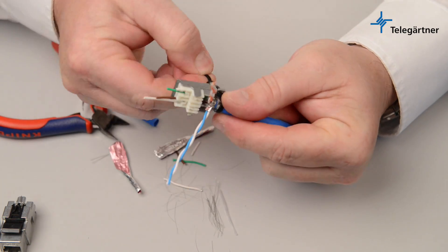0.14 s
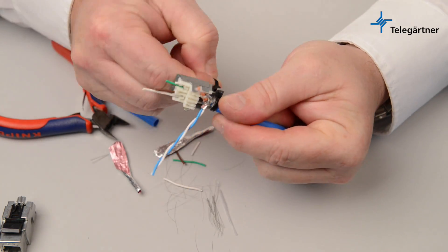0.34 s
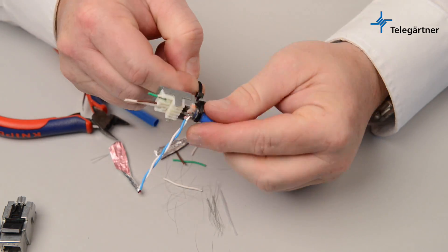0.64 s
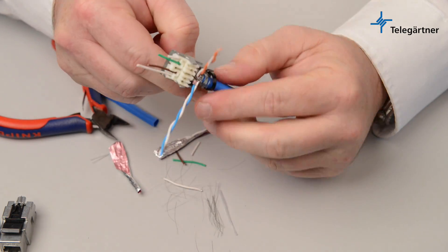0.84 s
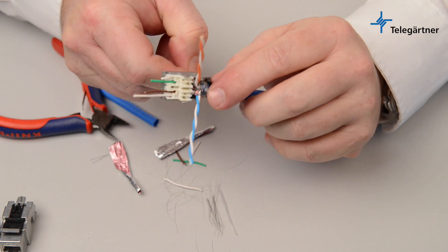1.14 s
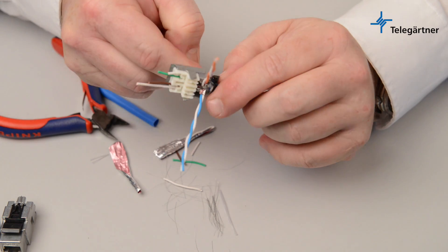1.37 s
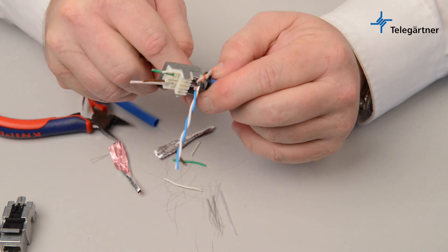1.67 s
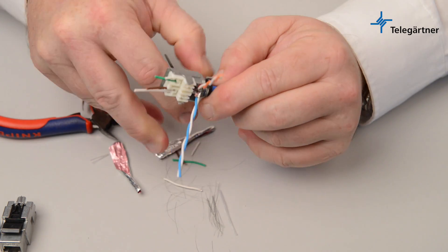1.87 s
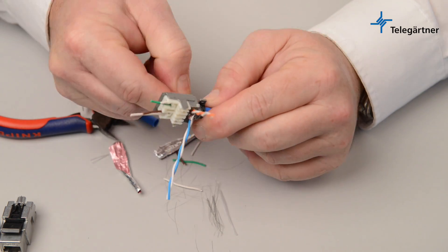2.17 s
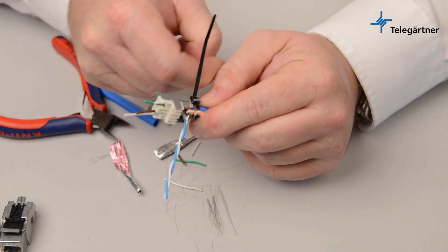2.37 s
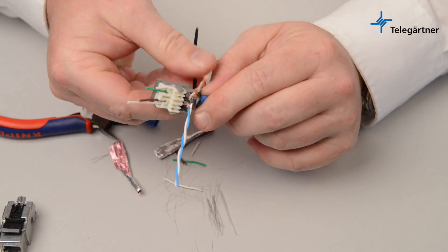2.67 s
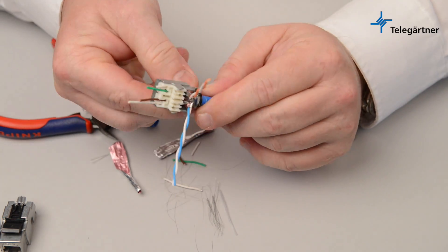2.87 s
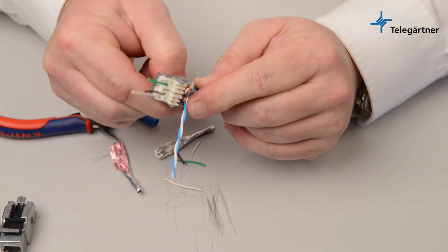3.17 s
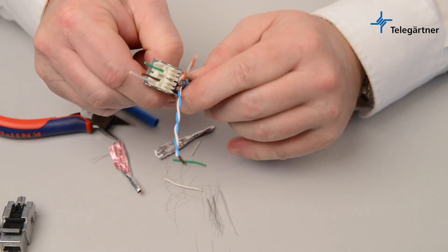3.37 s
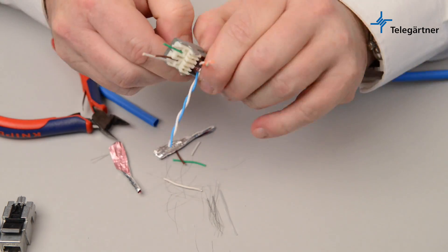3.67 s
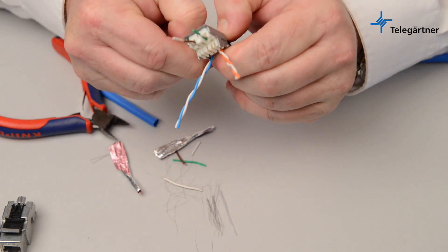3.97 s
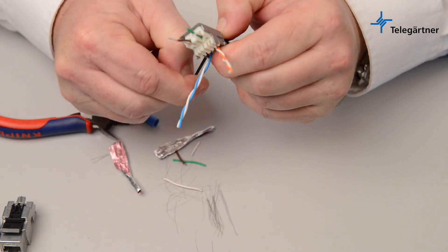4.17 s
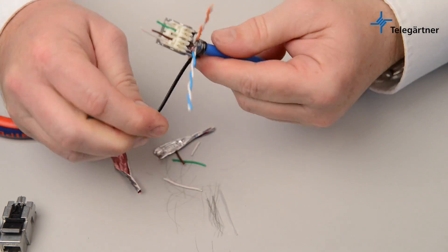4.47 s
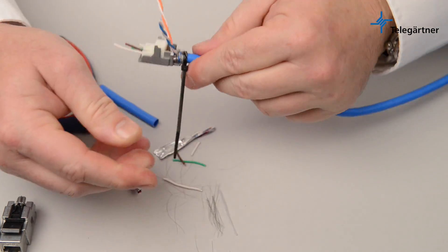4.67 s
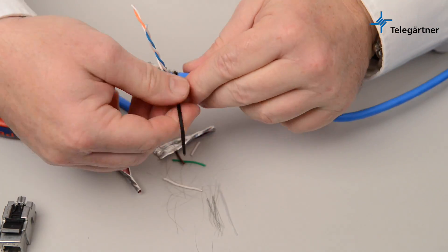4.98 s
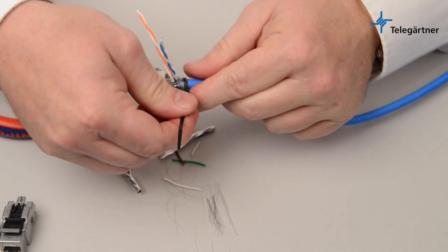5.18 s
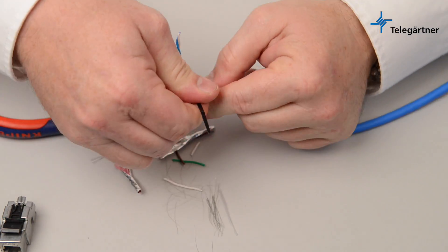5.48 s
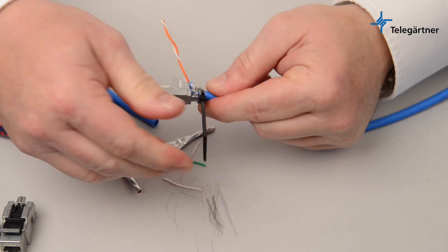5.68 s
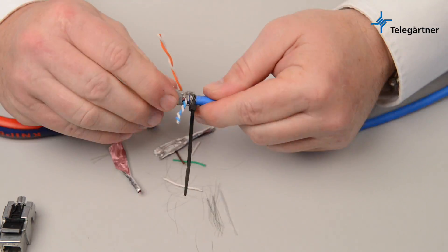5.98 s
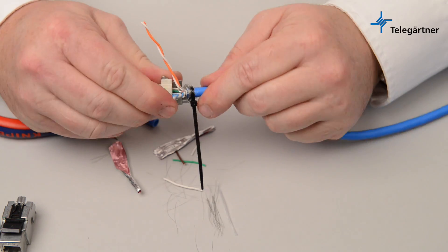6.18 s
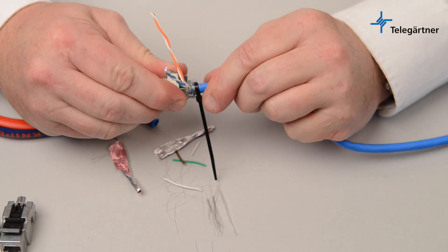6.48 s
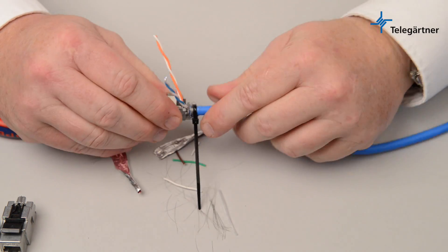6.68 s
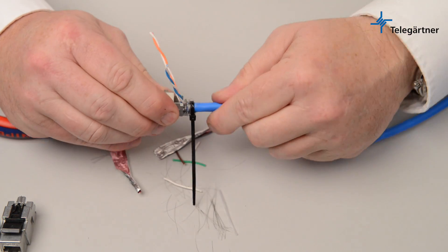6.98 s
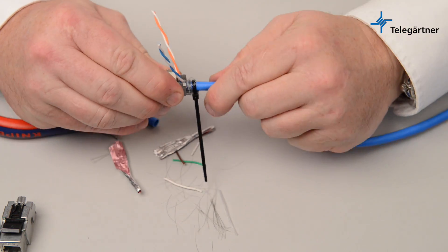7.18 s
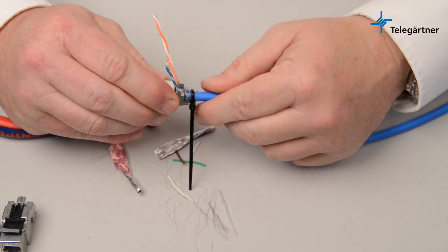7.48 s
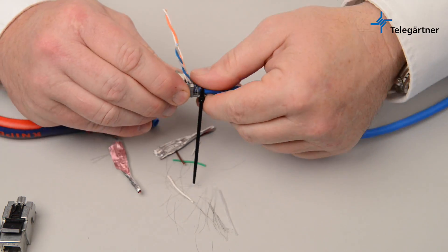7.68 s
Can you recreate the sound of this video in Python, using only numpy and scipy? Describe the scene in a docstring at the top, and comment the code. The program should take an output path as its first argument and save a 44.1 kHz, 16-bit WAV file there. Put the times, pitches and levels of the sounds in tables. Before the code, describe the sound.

A close microphone in a small hard room catches quiet ventilation, fuzzy fan hum and a barely audible steady electrical whine. From 0.15 to 0.55 seconds, a plastic cable tie clicks unevenly through its head, with two sharper snaps around 0.33. A few tiny metal ticks follow. At 1.37 the clicks resume and tighten into a loud, rapid zip until 1.56. A faint bump leads to a bright double snap at 2.23 with weaker clicks after, and another hard snap comes at 3.27. Skin rubs softly around 3.4; light clicks and hollow bench knocks arrive near 3.8. A slight strap slip precedes strong woody knocks at 4.57 to 4.8, then faint rubbing and sparse ticks. A soft knock at 6.3 leads to a heavy, duller bump cluster around 6.7 to 6.9. Smaller bumps come near 7.65. Brief flutter echoes follow the impacts.

```python
"""Cable tie pulled through its head

Fingers pull a plastic cable tie: the pawl lands and rebounds on the teeth in short runs, a burst each.
Small metal contacts tick as narrow modes; grainy hiss leads into some loud blows; the strap slips as
the same hiss and rubs on skin through its resonances; a cable end knocks on the hollow bench, driving
damped modes and a dense board. A fan hums as fuzzy tones in ventilation noise, over a faint steady
electrical whine. The small hard room answers with flutter echoes and a short tail."""
import sys
import numpy as np
from scipy import signal
from scipy.io import wavfile
from scipy.ndimage import uniform_filter1d

SR = 44100
rng = np.random.default_rng(int(sys.argv[2]) if len(sys.argv) > 2 else 0)


def natural_amplitude(level_db):
    """Convert a level in decibels to a linear amplitude factor, elementwise."""
    exponent = np.asarray(level_db, float) / 20
    return 10 ** exponent


def master_out(mix):
    """Clip the mix to full scale and print it as 16-bit PCM to the path in sys.argv[1]."""
    frames = np.transpose(np.atleast_2d(mix))
    ceiling = np.clip(frames, -1, 1)
    pcm = np.round(ceiling * 32767).astype(np.int16)
    wavfile.write(sys.argv[1], SR, pcm)


N = 345303  # samples

# Broad colour of plastic snaps, hisses and clicks: (frequency [Hz], relative level [dB])
PLASTIC_COLOUR = [(700, -65.5), (1700, -40.5), (2300, -27), (2900, -6.5), (4200, -2.5), (5800, 3),
                  (7800, 4), (10000, 7), (13000, 0), (15500, -2.5), (17000, -54.5)]
SLIDE_FADE_DB = -6.5  # reached at the end of a slip or stroke


def evened(x):
    """Scales to unit rms."""
    return x / np.sqrt(np.mean(x ** 2) + 1e-20)


def peaked(x, db):
    """Scales to a peak level."""
    return natural_amplitude(db) * x / abs(x).max()


def read(points, hz):
    """Interpolates a table over log frequency."""
    f, value = np.transpose(points)
    return np.interp(np.log(hz + 1), np.log(f + 1), value)


def add(mix, s, sound):
    """Adds a sound at s seconds, cut at the end of the mix."""
    part = mix[round(s * SR):][:len(sound)]
    part += sound[:len(part)]


def ring(hz, t60_s, size):
    """A damped sine."""
    t = np.arange(size) / SR
    return natural_amplitude(-60 * t / t60_s) * np.sin(2 * np.pi * hz * t)


def resonate(x, hz, width_hz):
    """Resonance on a fixed or moving frequency: shifts it to zero, smooths twice, shifts back."""
    turn = np.exp(2j * np.pi * np.cumsum(hz * np.ones(len(x))) / SR)
    r = np.exp(-np.pi * width_hz / SR)
    smooth = signal.lfilter([(1 - r) ** 2], [1, -2 * r, r * r], x / turn)
    return 2 * (turn * smooth).real


def causal(points, size=1024):
    """Minimum-phase impulse response with the given spectrum."""
    log_gain = np.log(natural_amplitude(read(points, abs(np.fft.fftfreq(size, 1 / SR)))))
    return np.fft.ifft(np.exp(np.conj(signal.hilbert(log_gain)))).real[:size // 2]


def wander(count, size):
    """Slow random curve of unit rms: noise averaged twice over size steps."""
    return evened(uniform_filter1d(uniform_filter1d(rng.standard_normal(count), size), size))


def air():
    """Ventilation noise in drifting spectral patches, with fan tones of narrow-band noise."""
    # Noise spectrum: (frequency [Hz], relative density [dB])
    air_colour = [(15, -72.5), (25, -46.5), (131, -15.5), (214, -15), (457, 3.5), (510, -9.5), (600, -1),
                  (831, -7.5), (1060, -5.5), (1640, -16.5), (1830, -15.5), (4600, -34), (5270, -33),
                  (15600, -41.5), (16800, -64.5)]
    # Ventilation swells and sinks: (time [s], level [dB])
    air_level = [(0.0, -59.5), (4.45, -60), (4.64, -56.5), (5.84, -64.5), (7.0, -57), (7.5, -62),
                 (7.83, -56.5)]
    # Share of swell and gusts per frequency, treble steady: (frequency [Hz], share)
    restless = [(1200, 1), (3500, .3)]
    # Fan tones: (frequency [Hz], width [Hz], mean level [dB])
    fan = [(341, 68, -73.5), (460, 66, -71.5), (650, 91, -78.5), (1041.3, 83, -65)]
    gust_db, patch_db = 1.5, 2.9  # rms
    hop = 256
    frames, hz = N // hop + 5, np.fft.rfftfreq(1024, 1 / SR)
    a, b, patches = rng.standard_normal((frames, 513, 3)).T
    patches = evened(uniform_filter1d(uniform_filter1d(patches, 10, 0), 16, 1))
    s, db = np.transpose(air_level)
    mean_db = db.mean()
    swell_db = np.interp(np.arange(frames) * hop / SR, s, db - mean_db)
    motion_db = gust_db * wander(frames, 12) + swell_db
    field_db = read(air_colour, hz)[:, None] + read(restless, hz)[:, None] * motion_db
    field_db = field_db + patch_db * patches
    wash = signal.istft((a + 1j * b) * natural_amplitude(field_db), nperseg=1024, noverlap=768)[1][:N]
    tones = np.zeros(N)
    for tone_hz, width_hz, tone_db in fan:
        unsteady = natural_amplitude(tone_db + 4.0 * wander(N, 2500))
        tones += unsteady * evened(resonate(rng.standard_normal(N), tone_hz, width_hz))
    tone_swell_db = np.interp(np.arange(N) / SR, s, db - mean_db)
    return natural_amplitude(mean_db) * evened(wash) + natural_amplitude(tone_swell_db) * tones


def whine():
    """Steady electrical tones: plain sines."""
    # (frequency [Hz], rms level [dB])
    whine_tones = [(1771, -91.5), (8651, -95.5), (8753, -94.5), (9749, -102)]
    t = np.arange(N) / SR
    return sum(np.sqrt(2) * natural_amplitude(db) * np.sin(2 * np.pi * hz * t) for hz, db in whine_tones)


def grainy_noise(length_s):
    """Time axis and white noise under a quickly varying random gain."""
    t = np.arange(0, length_s, 1 / SR)
    noise = rng.standard_normal(len(t))
    grain_db = 2.8 * evened(uniform_filter1d(rng.standard_normal(len(t)), 150))
    return t, noise * natural_amplitude(grain_db)


def hisses():
    """Grainy hiss in plastic colour: faint leads swell into a loud snap or knock, strap slips weaken."""
    # Hiss leading into a loud snap or knock: (start [s], length [s], level before the swell [dB])
    leads = [(0.133, .017, -60), (1.354, 0.014, -57.5), (2.2, .026, -54), (3.238, 0.029, -53.5),
             (4.638, .055, -61), (6.663, 0.064, -70.5)]
    # Strap sliding through the fingers: (start [s], length [s], starting level [dB], brightness [dB])
    slips = [(4.322, 0.19, -76, -10.5), (6.348, .12, -82, -11)]
    swell_db, swell_s, lead_bright_db = 15.5, 0.003, -4.5
    out, edge = np.zeros(N), causal(PLASTIC_COLOUR)
    split = signal.butter(2, 7000, fs=SR)
    rows = [(*row, lead_bright_db, True) for row in leads] + [(*row, False) for row in slips]
    for s, length_s, db, bright_db, is_lead in rows:
        t, grain = grainy_noise(length_s)
        if is_lead:
            shape_db = swell_db * np.exp((t - length_s) / swell_s)
        else:
            shape_db = SLIDE_FADE_DB * t / length_s
        hiss = evened(np.convolve(grain, edge)[:len(grain)])
        dull = signal.lfilter(*split, hiss)
        tilted = dull / natural_amplitude(bright_db) + hiss - dull
        add(out, s, natural_amplitude(db + shape_db) * signal.windows.tukey(len(t), 0.1) * tilted)
    return out


def room(near, x):
    """Flutter echoes of near; x feeds two sparse random tails that die by band, faster late."""
    # Flutter between bench and ceiling: (delay [ms], level [dB])
    flutter = [(4.2, -9), (8.7, -19.5), (12.9, -15.5), (17.2, -21)]
    # Decay before the late drop: (frequency [Hz], T60 [s])
    decay = [(300, 0.27), (1000, 0.52), (3000, 0.35), (8000, 0.35), (16000, 0.34)]
    tail_db, turn_hz = -5.5, 11
    at, out = np.arange(250, SR // 2 - 12, 12), np.zeros(N)
    for ms, db in flutter:
        add(out, ms / 1000, natural_amplitude(db) * near)
    for k in range(2):
        taps = np.zeros(SR // 2)
        taps[at + rng.integers(0, 12, len(at))] = rng.choice([-1., 1.], len(at))
        hz, t, z = signal.stft(taps, SR, nperseg=128)
        fall_db = -60 * t / read(decay, hz)[:, None] - (t / 0.05) ** 4
        tail = signal.istft(z * natural_amplitude(fall_db), SR, nperseg=128)[1]
        turn = np.sin(2 * np.pi * turn_hz * np.arange(N) / SR + k * np.pi / 2)  # tails take turns
        out += natural_amplitude(tail_db) * signal.fftconvolve(x * turn, tail / np.linalg.norm(tail))[:N]
    return out


def snaps():
    """Pawl landing, rebounds and rattle, coloured by pawl and head; returns direct and room send."""
    # (time [s], peak [dB], pawl ring [Hz], head body [dB], room send peak [dB])
    snap_rows = [(0.1523, -23, 8900, -34, -13.5), (0.2223, -25.5, 8900, -33.5, -15),
                 (0.242, -25.5, 7900, -41, -14.5), (0.305, -28.5, 7600, -42, -16),
                 (0.3168, -23, 7460, -40.5, -15), (0.3305, -12.5, 8650, -51, -13.5),
                 (0.3436, -13, 9100, -38, -16), (0.3952, -24, 8000, -35, -16.5),
                 (0.4499, -28.5, 8000, -36, -18.5), (0.504, -28.5, 9500, -42, -16.5),
                 (0.5607, -28.5, 8560, -30, -16.5), (1.3710, -20.5, 10500, -21.5, -11.5),
                 (1.4091, -20.5, 9000, -24, -13.5), (1.4544, -21, 10540, -27, -11),
                 (1.471, -10.5, 9700, -37, -22.5), (1.485, -9, 10500, -38, -18),
                 (1.5009, -12.5, 9500, -34, -18), (1.5150, -9.5, 10000, -33, -10.5),
                 (1.5306, -12, 10170, -27, -10), (1.5392, -14.5, 9800, -20.5, -17),
                 (1.5636, -14, 7800, -24.5, -15), (2.232, -12, 10600, -46.5, -16.5),
                 (2.2475, -9, 11240, -32.5, -10.5), (2.3243, -21.5, 10400, -14.5, -17.5),
                 (2.3799, -26.5, 9880, -33.5, -32.5), (3.267, -13, 10200, -27, -9),
                 (3.3579, -27.5, 8600, -28, -13), (3.7590, -33, 7900, -44, -30),
                 (3.7743, -38, 8700, -34, -17), (3.8076, -18.5, 10000, -29, -22),
                 (3.9384, -28.5, 6450, -36.5, -35), (3.9564, -40, 6500, -27, -51.5)]
    # Pawl landing and rebounds, before random spread: (delay [ms], signed strength)
    rebounds = [(0, 1), (.5, .75), (1.2, -.45), (1.6, .3), (2.1, -.22)]
    firm_hz, bright_db_per_octave = 10200, 12.5  # higher pawl ring, brighter snap
    direct, send = np.zeros(N), np.zeros(N)
    hz, colour_db = np.transpose(PLASTIC_COLOUR)
    thin = signal.butter(6, 2000, "high", fs=SR)  # a part this small radiates no bass
    for s, db, pawl_hz, head_db, send_db in snap_rows:
        rattle_db = -60 * np.arange(600) / SR / 0.015
        drive = 0.12 * rng.standard_normal(600) * natural_amplitude(rattle_db)
        for ms, strength in rebounds:
            delay = round(ms * rng.uniform(0.93, 1.07) * SR / 1000)
            drive[delay] += strength * rng.uniform(0.8, 0.88)
        tilt_db = bright_db_per_octave * np.log2(pawl_hz / firm_hz)
        edge = causal(np.transpose([hz, colour_db + tilt_db * np.log2(hz / 8000)]))
        pawl = 0.19 * ring(pawl_hz, t60_s=0.001, size=512)
        head = natural_amplitude(head_db) * ring(2280, t60_s=0.01, size=512)
        body = peaked(edge, 0) + pawl + head
        add(direct, s, peaked(signal.lfilter(*thin, np.convolve(drive, body)), db))
        add(send, s, peaked(signal.lfilter(*thin, body), send_db))  # rebounds blur in the diffuse field
    return direct, send


def knocks():
    """Rough contacts drive bench modes and board, hard ones the high modes; returns body and edge."""
    # (time [s], body level [dB], edge re body [dB], hardness [dB/octave], contact [s])
    knock_rows = [(0.605, -46, -38, -2, 0.021), (2.147, -45, -23.5, -16, 0.0036),
                  (3.564, -45.5, -32, -7, 0.0061), (3.762, -35.5, -8, 26, 0.01),
                  (3.811, -31, -14, 15, 0.0013), (4.564, -45, 13, 12, 0.0007),
                  (4.57, -30.5, -11, 6.5, 0.019), (4.703, -24.5, 2.5, 21, 0.00031),
                  (4.706, -15, -29, 10, 0.00079), (4.735, -28.5, -31.5, -6, 0.019),
                  (4.79, -34, -29, -1.5, 0.0063), (4.858, -43.5, -40, -8, 0.0024),
                  (6.317, -39, -15, 32, 0.00049), (6.714, -37.5, -35, 3.5, 0.0086),
                  (6.797, -29, -14.5, -1, 0.021), (6.818, -15.5, -27, -1.5, 0.015),
                  (6.84, -19, -49, -4, 0.015), (6.884, -29, -49, -5, 0.008), (7.649, -32.5, -12, 1, 0.0069),
                  (7.668, -30.5, -24, -5.5, 0.014), (7.712, -38.5, -30.5, -3, 0.011)]
    # Bench modes: (frequency [Hz], relative level [dB], T60 [s])
    bench_modes = [(492.4, -11.5, 0.11), (621.4, -2, 0.1), (660.2, 1.5, .15), (824, -7, .08),
                   (875, 4, 0.14), (964, 10, 0.043), (1398, 6, 0.028), (1544, 2.5, 0.078),
                   (1665, -18, 0.075), (2000, -1, 0.031), (2170, -10.5, .03), (2604, -16, 0.025)]
    # Broad colour of the bench top: (frequency [Hz], relative level [dB])
    board_colour = [(150, -65.5), (330, -13.5), (500, 3), (800, 3.5), (1200, -7.5), (1800, -6.5),
                    (2700, -20.5), (4000, -39.5), (8000, -111)]
    hard_top_hz, thud_hz, thud_db = 2300, 162, -39  # each blow also shoves the whole bench
    out, edges, t = np.zeros(N), np.zeros(N), np.arange(9000) / SR
    board_hz, board_db = np.transpose(board_colour)
    high = signal.butter(3, [1900, 6500], "band", fs=SR)
    thin = signal.butter(4, 380, "high", fs=SR)
    thud = ring(thud_hz, t60_s=0.059, size=len(t)) * (1 - np.exp(-t / 0.0029))
    board_octaves = np.log2(np.minimum(board_hz, hard_top_hz) / 700)
    for s, db, edge_db, hard_db, contact_s in knock_rows:
        u = t / contact_s
        drive = rng.standard_normal(len(t)) * np.sqrt(u) * np.exp(-u)
        modes = np.zeros(len(t))
        for hz, mode_db, t60_s in bench_modes:
            lift_db = hard_db * np.log2(min(hz, hard_top_hz) / 700)
            modes += natural_amplitude(mode_db + lift_db) * ring(hz, t60_s, size=len(t))
        board = causal(np.transpose([board_hz, board_db + hard_db * board_octaves]), size=2048)
        dense = evened(signal.fftconvolve(drive, board)[:len(t)])
        struck = evened(modes * (1 - np.exp(-u))) + 1.37 * dense
        add(out, s, peaked(signal.lfilter(*thin, struck), db) + peaked(thud, db + thud_db))
        add(edges, s, peaked(signal.lfilter(*high, drive), db + edge_db))
    return out, edges


def linger(x):
    """Far corners hold a knock a little longer: a faint, smooth tail of decaying noise."""
    t60_s, level_db = 0.56, -31
    t = np.arange(SR) / SR
    tail = rng.standard_normal(SR) * natural_amplitude(-60 * t / t60_s) * np.minimum(t / 0.046, 1)
    return natural_amplitude(level_db) * signal.fftconvolve(x, tail / np.linalg.norm(tail))[:N]


def ticks():
    """Narrow modes set off by a tiny scrape, over a short broad click; faint strays at random."""
    # (time [s], peak [dB], ring [Hz], click re ring [dB])
    tick_rows = [(0.9801, -41.5, 9260, -24), (1.1660, -47, 7300, -1), (1.9038, -50, 9180, 6.5),
                 (1.935, -53, 9230, 0.5), (2.551, -56.5, 14960, 5), (3.028, -62, 7600, 4),
                 (3.0723, -49, 5850, 7.5), (3.1166, -54.5, 9570, -1.5), (3.5369, -52, 7420, -22),
                 (4.401, -57, 4140, -1), (4.416, -54, 7430, -16), (4.6583, -46.5, 7650, -5),
                 (4.752, -48, 4000, -5), (5.387, -54.5, 7360, 0), (5.4101, -47, 7900, 4),
                 (5.7019, -58, 14200, -1), (6.1215, -65.5, 10200, 3), (6.5386, -48, 10270, 10.5),
                 (6.667, -52, 7000, -14), (7.692, -52, 4990, 3), (7.8031, -59, 10250, 0.5)]
    # (multiple of the ring, relative level [dB])
    tick_modes = [(.49, -10.5), (.68, -11.5), (0.999, 14), (1.21, -11), (1.34, -15)]
    faint_per_s, faint_db = 1.3, -70
    mode_t60_s, scrape_s, click_t60_s = 0.008, 0.003, 0.0046
    out, edge, t = np.zeros(N), causal(PLASTIC_COLOUR), np.arange(4000) / SR
    gap, size, pitch = rng.random((30, 3)).T
    at = np.cumsum(-np.log(gap)) / faint_per_s
    faint = np.transpose([at, faint_db + 6 * (size - 0.5), 7000 + 3500 * pitch, 0 * at])
    faint = faint[at < N / SR]
    for s, db, hz, click_db in [*tick_rows, *faint]:
        burst = rng.standard_normal(len(t)) * natural_amplitude(-60 * t / click_t60_s)
        click = np.convolve(burst, edge)[:len(t)]
        scrape = rng.standard_normal(400) * np.exp(-t[:400] / scrape_s)
        modes = sum(natural_amplitude(mode_db) * ring(hz * k, mode_t60_s, size=len(t)) for k, mode_db in tick_modes)
        scraped = signal.fftconvolve(modes, scrape)[:len(t)]
        add(out, s, peaked(peaked(scraped, 0) + peaked(click, click_db), db))
    return out


def strokes():
    """Skin strokes the strap slowly: friction through resonances that wander under the finger."""
    # (start [s], length [s], starting level [dB], brightness [dB/octave])
    stroke_rows = [(3.41, 0.33, -66.5, 8.5), (4.821, 0.51, -69.5, -7)]
    # Strap under the skin: (frequency [Hz], width before narrowing [Hz], relative level [dB])
    strap_modes = [(2540, 210, 1), (3650, 240, -1), (4320, 470, 2.5), (5370, 710, -1), (6900, 570, -16),
                   (7580, 1200, -4), (10500, 790, -18)]
    waver, narrowing = 0.03, 0.89  # rms share of the frequency; share of the width
    out = np.zeros(N)
    for s, length_s, db, bright_db in stroke_rows:
        t, grain = grainy_noise(length_s)
        strap = np.zeros(len(t))
        for hz, width_hz, mode_db in strap_modes:
            drift = evened(uniform_filter1d(rng.standard_normal(len(t)), 2500))
            mode = evened(resonate(grain, hz * (1 + waver * drift), narrowing * width_hz))
            strap += natural_amplitude(mode_db + bright_db * np.log2(hz / 4400)) * mode
        shape = natural_amplitude(db + SLIDE_FADE_DB * t / length_s) * signal.windows.tukey(len(t), 0.35)
        add(out, s, shape * evened(strap))
    return out


def scene():
    """Sums the near sounds, the room's answer, the air and the whine."""
    direct, send = snaps()
    small = ticks() + hisses() + strokes()
    bench, edges = knocks()
    near = direct + small + natural_amplitude(-0.5) * bench + edges
    room_feed = send + natural_amplitude(-3.0) * small + natural_amplitude(1) * bench + natural_amplitude(-8) * edges
    wet = room(near, room_feed) + linger(bench)
    return (near + wet + air() + whine())[None]


def roll_off(x):
    """The treble ends steeply here."""
    return signal.sosfilt(signal.butter(12, 17150, fs=SR, output="sos"), x)


def record(dry):
    """The microphone thins the bass and ends near 16 kHz."""
    thin = signal.lfilter(*signal.butter(1, 60, "high", fs=SR), dry)
    lowpass = signal.firwin(255, 16200, window=("kaiser", 9), fs=SR)
    mix = signal.oaconvolve(thin, lowpass[None], "same")
    return roll_off(mix)


dry = scene()
out = record(dry)
master_out(out)
```